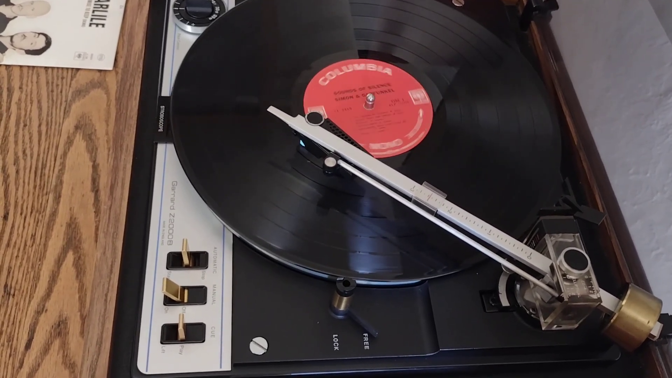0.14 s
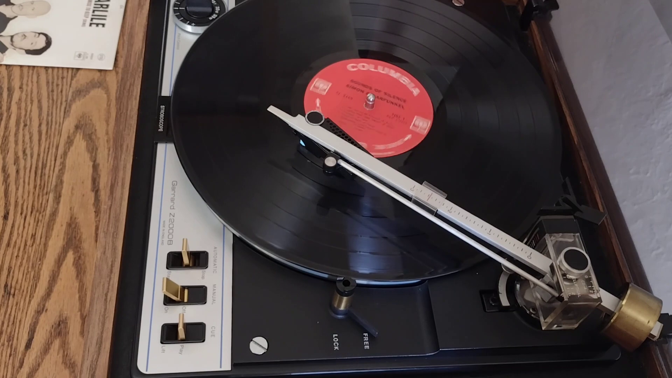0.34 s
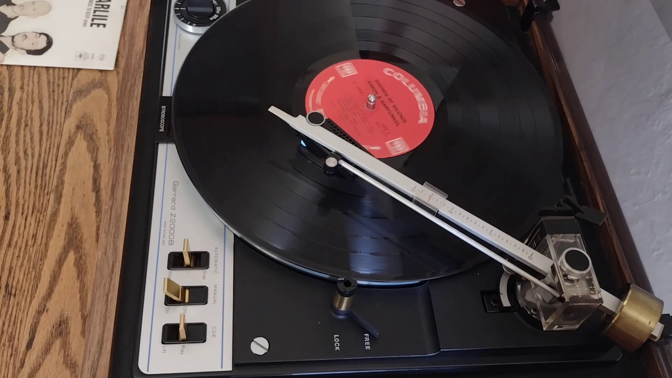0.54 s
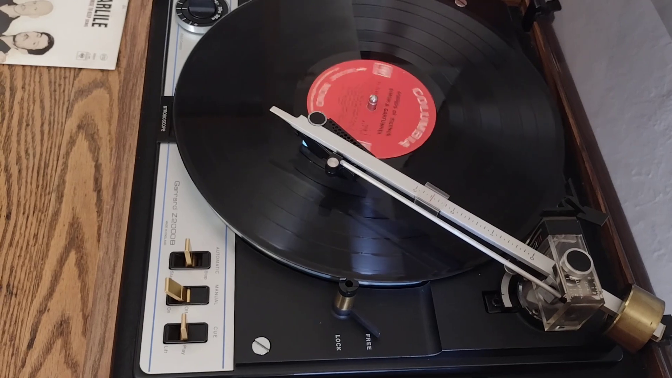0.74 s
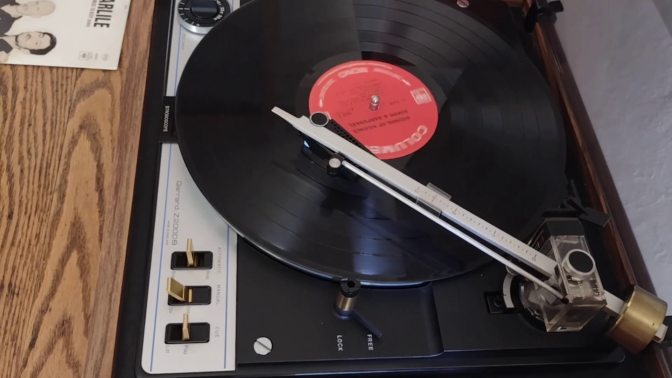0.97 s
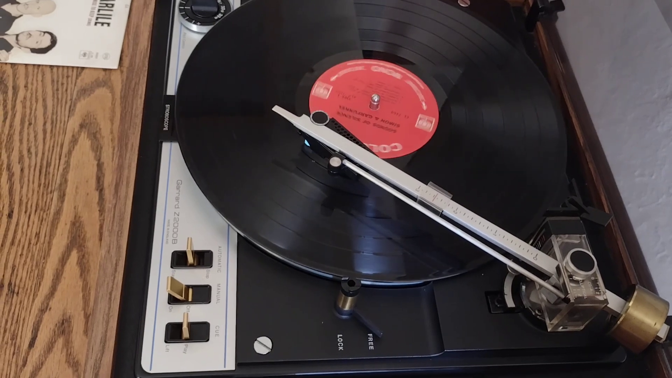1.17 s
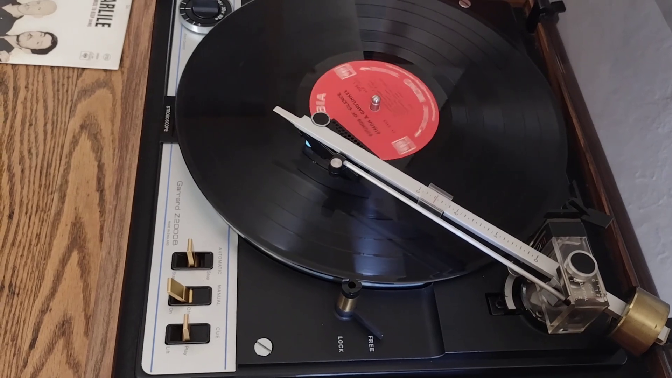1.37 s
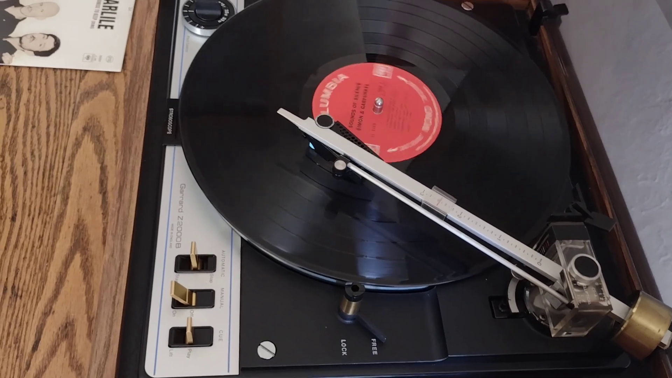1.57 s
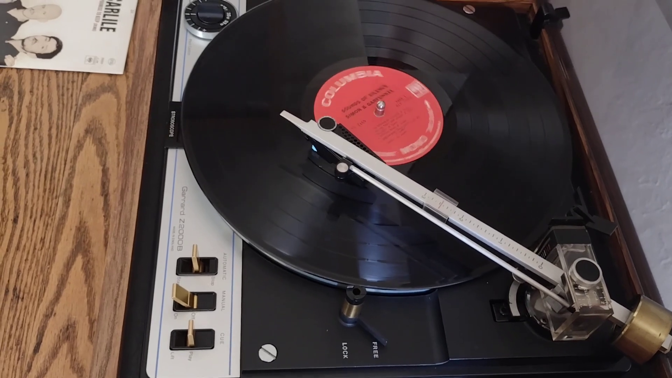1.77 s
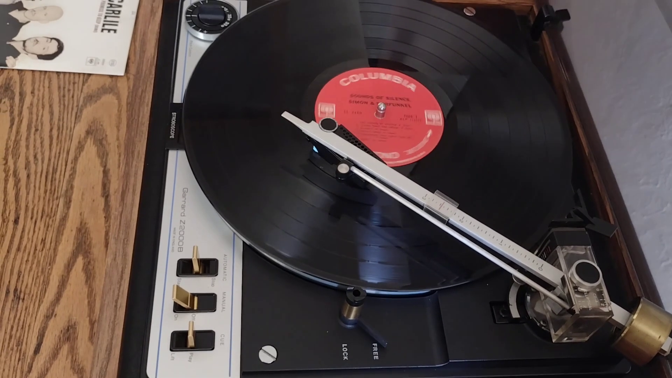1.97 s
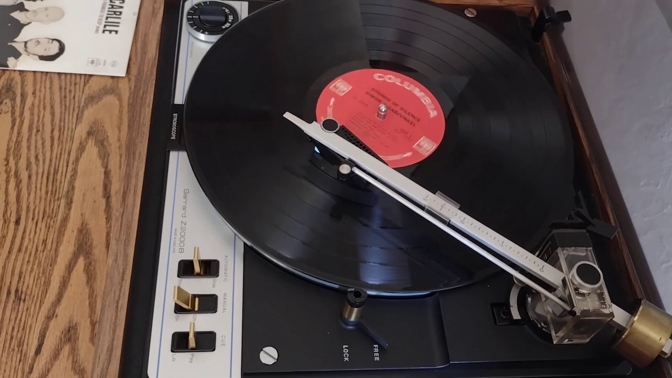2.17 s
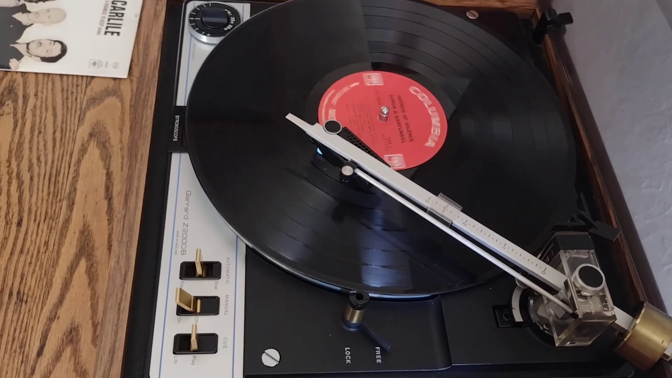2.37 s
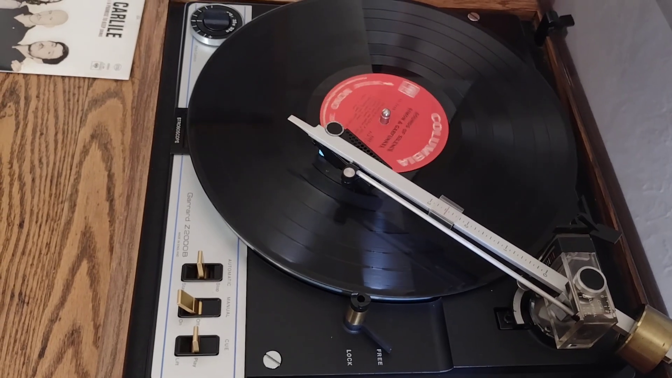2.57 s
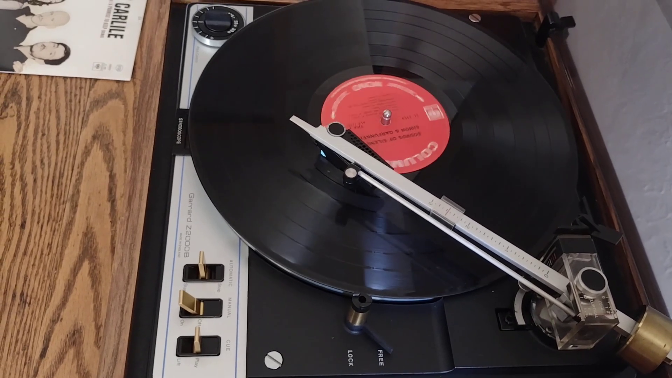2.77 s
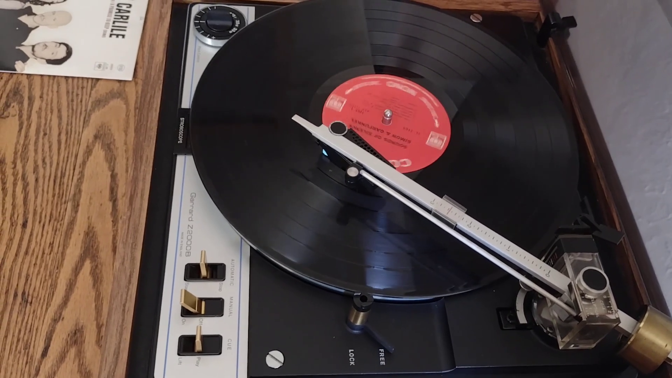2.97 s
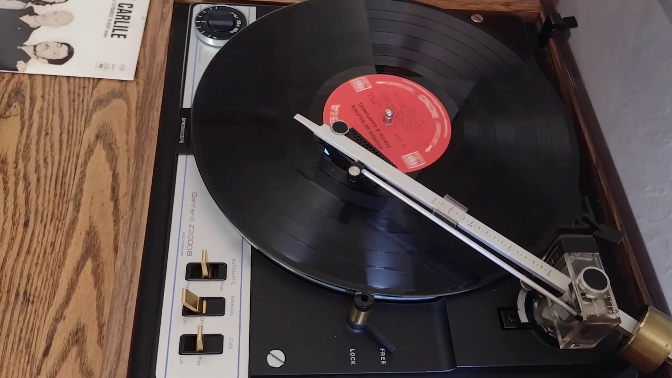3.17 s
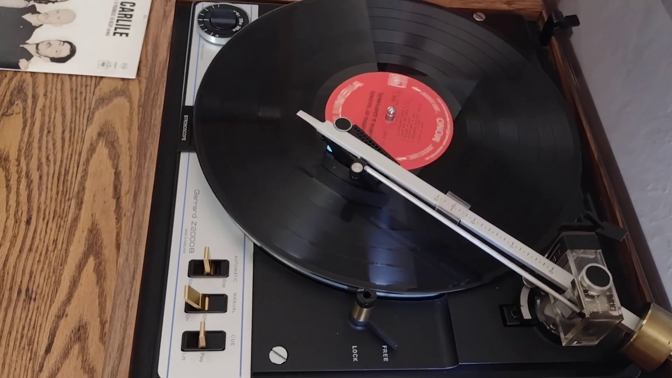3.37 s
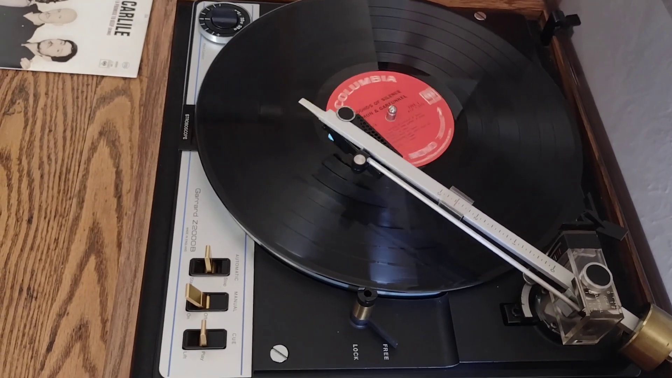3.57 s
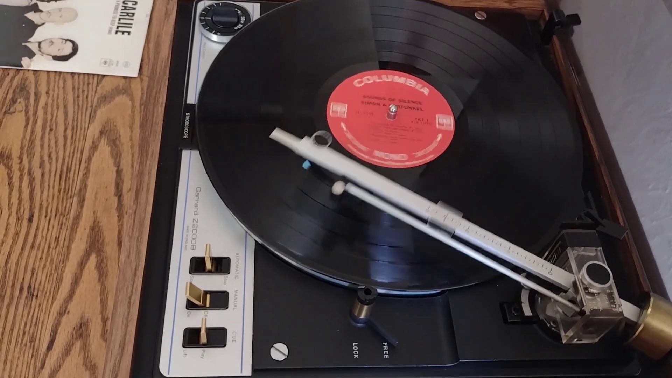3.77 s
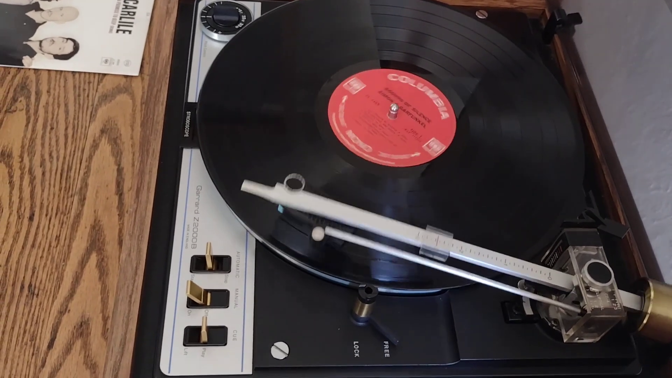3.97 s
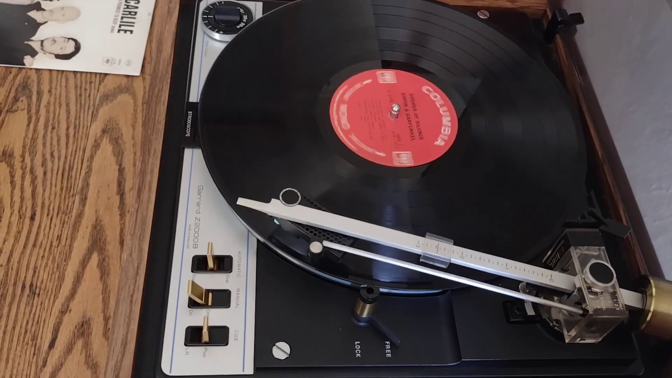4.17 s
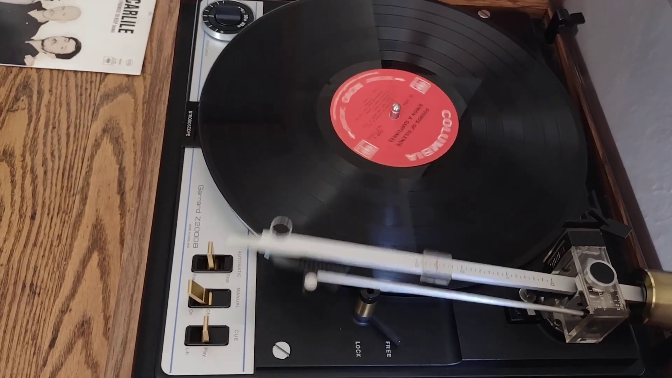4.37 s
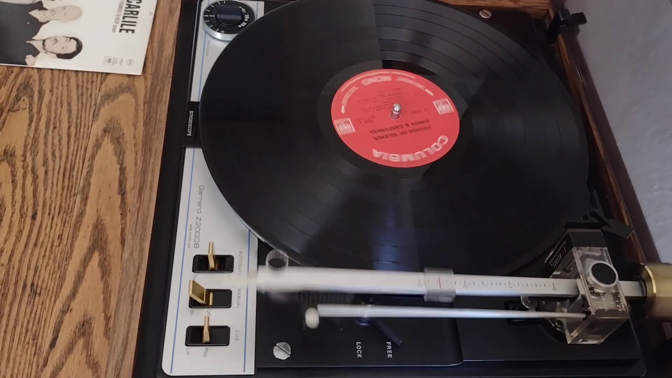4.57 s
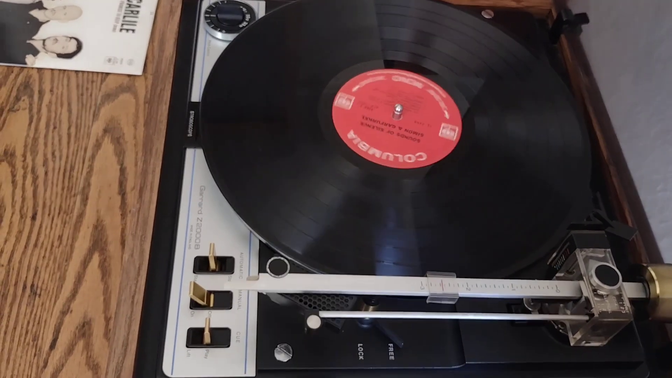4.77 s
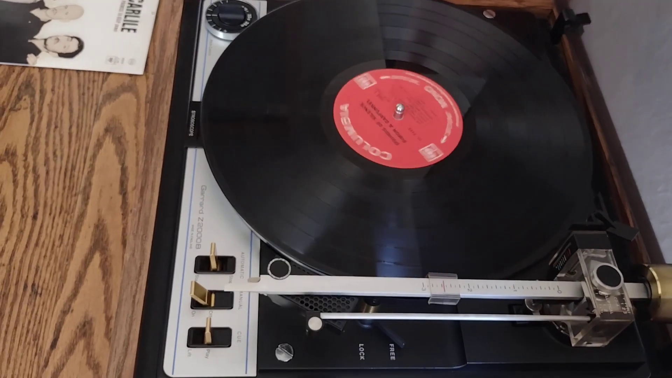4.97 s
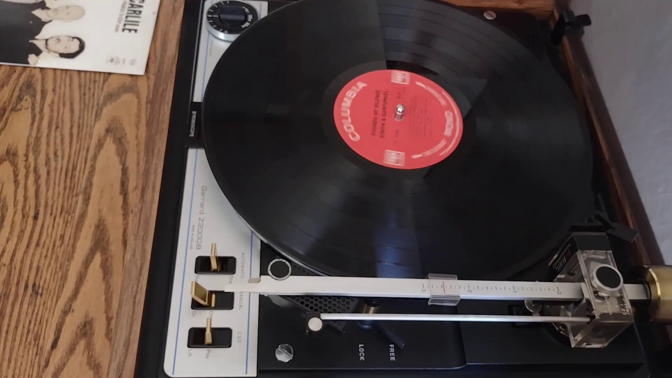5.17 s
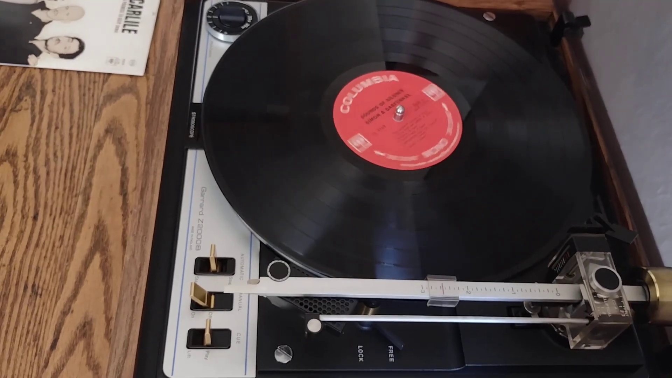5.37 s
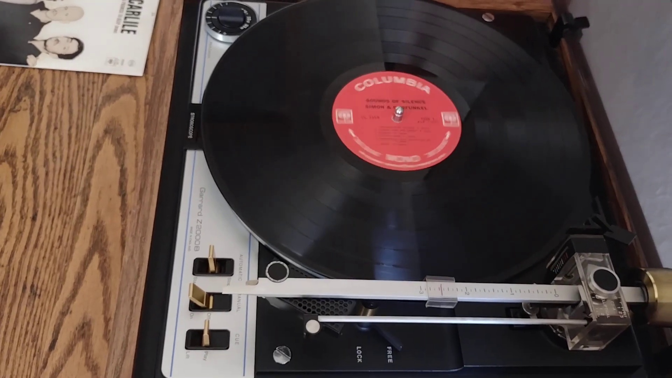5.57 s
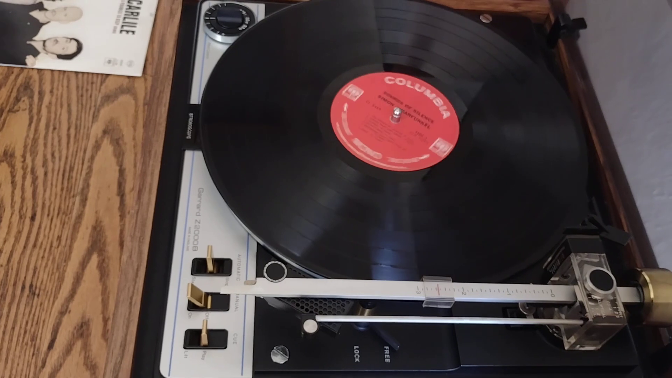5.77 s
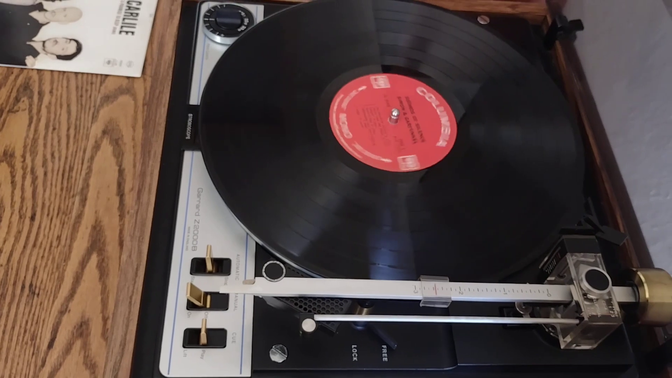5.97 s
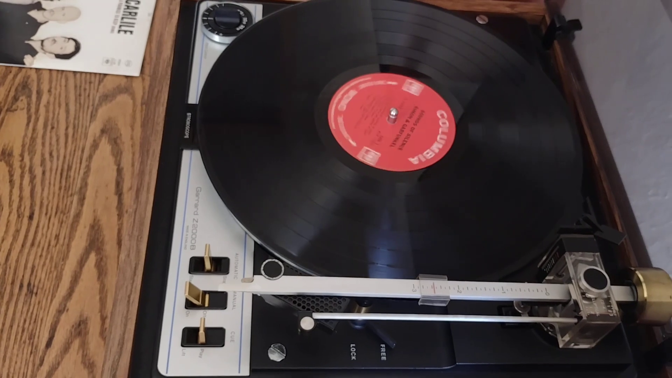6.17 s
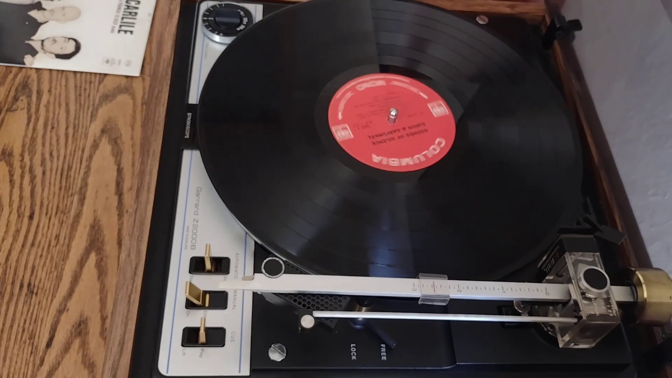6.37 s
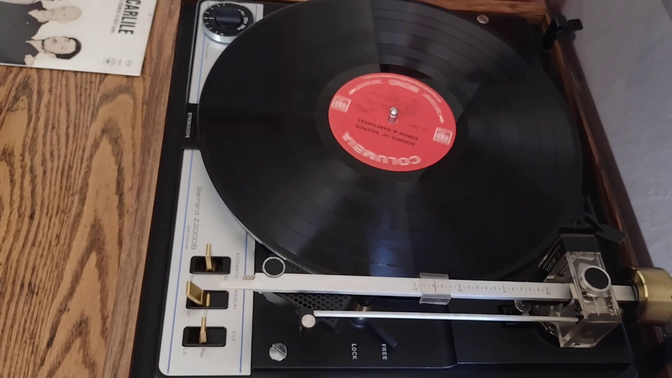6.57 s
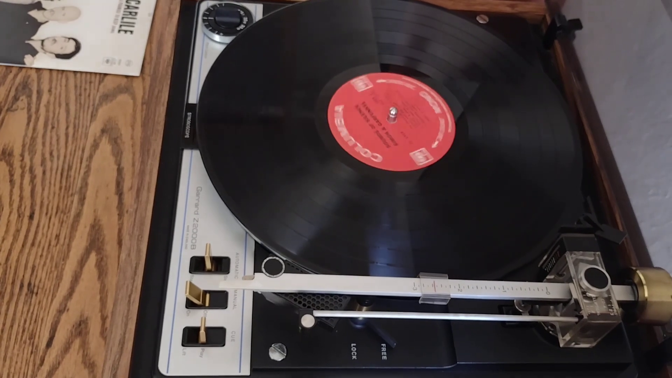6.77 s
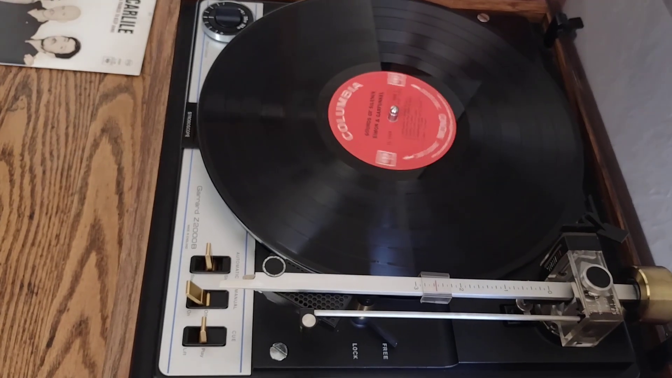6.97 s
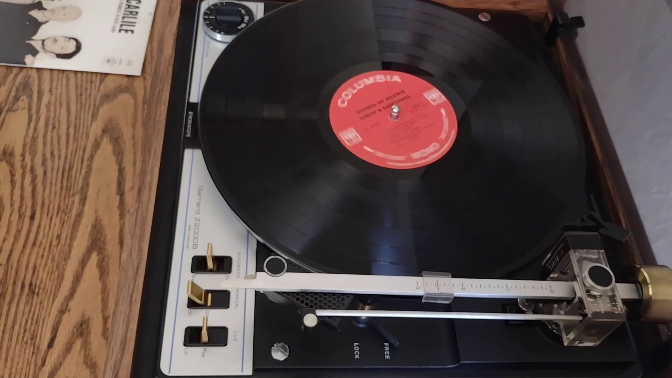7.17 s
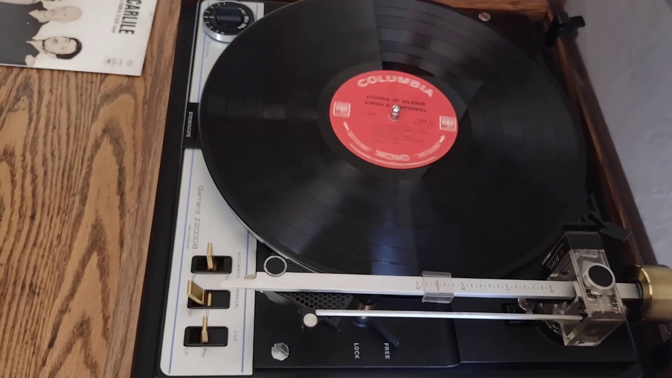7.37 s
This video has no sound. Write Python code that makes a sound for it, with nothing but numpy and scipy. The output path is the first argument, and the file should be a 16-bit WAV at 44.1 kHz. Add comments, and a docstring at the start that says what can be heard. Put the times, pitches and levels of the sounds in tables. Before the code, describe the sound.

An automatic turntable is heard from nearby, indoors, with short soft room echo. Faint loudspeaker rumble and groove crackle come first, with a muffled low thump near the start. After a calm stretch, levers snap in a quick irregular run, dry and steely, over a heavy bass thud. The arm swings home to separate clacks, light scraping and short bright hisses, fading into small ticks and gentle background hiss.

```python
"""A quiet room with an automatic record player: the stylus runs in the lead-out groove, and its rumble
comes through the loudspeakers as noise exciting damped cabinet modes; low soft thumps push and ring. The cam
lifts the arm and swings it home: levers clack as noisy cracks and ringing modes of the steel chassis, and the
cam slides on with a soft hiss of shaped noise and comes to rest. A diffuse echo and room tone surround them."""
import sys
import numpy as np
from scipy import signal
from scipy.fft import rfft, irfft, next_fast_len
from scipy.io import wavfile

SR = 44100
rng = np.random.default_rng(int(sys.argv[2]) if len(sys.argv) > 2 else 0)


def int16_out(signal):
    """Quantize to a 16-bit WAV file."""
    q = np.round(np.clip(np.atleast_2d(signal).T, -1, 1) * 32767)
    wavfile.write(sys.argv[1], SR, q.astype(np.int16))


N = 327663

# modes of loudspeaker cabinets and room: f/Hz, relative level/dB, t60/s
CABINET_MODES = [(68.46, -30, 0.27), (92.66, 6, 0.31), (107.8, -12, 1), (135.9, 1, 0.431), (167.6, 1, 0.28),
                 (190.5, -6, 0.39), (223, -4.5, 0.094), (251, -8, 0.1), (295.7, -1.5, 0.088),
                 (372, -0.5, 0.052), (408.6, -7, .25), (505, -6, 0.31), (658.3, -8, 0.13),
                 (733, -1.5, 0.09), (853, -10, 0.068)]
CUTOFF_HZ, BASS_CUT_HZ = 8376, 68


def clacks():
    """Impact excitation: each lever gives a short noisy crack and leaves the damped chassis modes ringing."""
    # lever blows: t/s, peak level/dB, colour near 500 Hz/dB, near 3.2 kHz/dB, near 6.5 kHz/dB, pin level/dB,
    # damping by the lever that stays pressed on/(dB per 10 ms), where negative values mean none
    blows = [(2.65, -53, 1.5, -15, -1, -30, -10), (2.662, -39, 2, -0.5, 6, -31, -1.5),
             (2.762, -29, -24, -7.5, -28, -35, 3), (2.787, -20, -24.5, -7.5, -26.5, -15.5, 0.2),
             (2.827, -46, -15, -17, -11, -45, -2), (3.046, -52.5, 1.5, -1, -1, -27, -2),
             (3.2346, -42, -12, 2, 13, -35, 2.5), (3.258, -28, -21, -8, -20.5, -11.5, 0.4),
             (3.381, -39, -32, -1.5, -4, -25.5, -4), (3.392, -22, -22, -13, -25.5, -17.5, .5),
             (3.4125, -24, -27, -5, -19.5, -11, -0.6), (3.607, -49, -12, -6, -5, -31, -4),
             (3.617, -38, -9.5, -5, 3, -27, .8), (3.625, -14.5, -28, -1, -17.5, -20, .3),
             (3.721, -22.5, -23.5, -6.5, -27.5, -13.5, 2.3), (3.881, -55.5, -8.5, -11, -18, -38, 0.5),
             (3.967, -51.5, -16.5, -5.5, -13, -30, 1.5), (3.987, -27.5, -27, -9, -35.5, -19.5, 1.3),
             (4.337, -52, -14, -9.5, -3.5, -23.5, 1), (4.479, -56, -18.5, -24, -33, -41.5, 1),
             (4.6446, -28, -17.5, -13.5, -4.5, -19, 3), (4.6936, -28, -8, -7.5, -4, -31, 4),
             (4.779, -53, -13.5, -9, -12.5, -36, -0.5), (5.012, -23.5, -30, -6, -25.5, -42.5, 5),
             (5.021, -30.5, -22.5, -8.5, -32, -44, 1.5), (5.761, -48, -14, -20, -31, -41, -2),
             (5.845, -51, -10, 8, 13, -30, 2.5), (5.994, -45, -4.5, 0, 4.5, -22, 0),
             (6.244, -58, -13, -20, -25, -25, 2.5), (6.415, -55.5, -20.5, 11.5, 3, -32.5, 4),
             (6.952, -53, -19, -15, -23.5, -29, 4), (7.001, -53.5, -21, 7, 5.5, -25.5, 3.5)]
    # strongest chassis modes: f/Hz, relative level/dB, t60/s
    chassis_modes = [(378.3, 9.5, 0.069), (621.3, 4.5, 0.088), (1097, -29.5, 0.074), (1300, -19.5, 0.15),
                     (1230, -7, 0.042), (1346, -13, 0.075), (1464.4, 2, 0.16), (1536.4, 2, 0.083),
                     (1575, -10.5, 0.1), (1879, -4, 0.09), (2014, -13.5, 0.044), (2561, -2, 0.016),
                     (3260, -9.5, 0.0676), (4030, -9, 0.035), (5990, -9, 0.0056)]
    # a small steel pin, rung at each blow's own level: f/Hz, relative level/dB, t60/s
    pin_modes = [(5570, 8, .032), (7750, 1, .022)]
    # a stronger blow cracks longer and rings more; a brighter one is a glancing tick that rings less
    full_scale_crack_ms, crack_ms_per_db = 13.5, 0.47   # decay time constant; shorter for each dB below
    ring_per_db, ring_per_treble_db = 0.37, -0.19
    crack_db, attack_ms = 10, 2.2
    shoulder_db = -5   # added at 1 kHz to half the colour near 500 Hz
    damping_hz = 1500   # strong modes lose level in step with their pitch; the damping column holds here
    out = np.zeros(N)
    hz = np.array(chassis_modes)[:, 0]
    signs = (-1.) ** np.arange(len(hz))   # neighbouring modes swing in opposite senses
    strong = damped(chassis_modes)
    small_hz, small = crowd(count=500)
    t = np.arange(small.shape[1]) / SR
    for s, peak_db, low_db, mid_db, high_db, pin_db, damping_db in blows:
        tint = [(500, low_db), (1000, low_db / 2 + shoulder_db), (1400, 0), (1950, 0),
                (2600, mid_db), (4200, mid_db), (6500, high_db)]
        loss_db = max(damping_db, 0) * t / .01

        gains_db = at_hz(tint, hz) + rng.normal(0, 2.0, len(hz))
        strong_gains = from_db(gains_db[:, None] - np.outer(hz / damping_hz, loss_db))
        ring = signs @ (strong * strong_gains)
        small_gains = from_db(at_hz(tint, small_hz)) * rng.standard_normal(len(small_hz))
        ring += from_db(-loss_db) * (small_gains @ small)

        crack_ms = max(full_scale_crack_ms + crack_ms_per_db * peak_db, 1)
        crack = colour(rng.standard_normal(len(t)), [(250, low_db - 16)] + tint)
        crack *= np.exp(-1e3 * t / crack_ms)

        ring_db = ring_per_db * peak_db + ring_per_treble_db * high_db
        sound = from_db(ring_db) * ring + ringing(pin_modes, pin_db) + from_db(crack_db) * crack
        contact = np.minimum(1e3 * t / attack_ms, 1)   # the contact force builds up
        add(out, s, sound * contact, peak_db)
    return out


def crowd(count):
    """Modal density: evenly scattered small modes of plates and levers; gives their f/Hz and signals."""
    # outline of the small modes: f/Hz, relative level/dB, t60/s
    outline = [(453, -17, 0.34), (1100, -10, 0.29), (1447, -10, 0.079), (2014, -13, 0.091),
               (2140, -26, 0.17), (2810, -8.5, 0.097), (3890, -11.5, 0.048), (4760, -20, 0.098),
               (6800, -6.5, 0.04), (8460, -29.5, 0.018)]
    hz = np.linspace(450, 8400, count) + rng.uniform(-8, 8, count)
    mode_db = at_hz(outline, hz)
    t60 = at_hz(np.array(outline)[:, ::2], hz)
    return hz, damped(np.transpose([hz, mode_db, t60]))


def sliding():
    """Sliding friction: the cam's strokes shape a bright hiss and a chassis rub from dense noise."""
    # hiss: f/Hz, relative spectral density level/dB
    slide_colour = [(1530, -40), (2600, -18.5), (3520, -3.5), (3840, -4.5), (4170, -8), (4840, -9.5),
                    (6880, -3), (7870, -11.5), (8220, -28), (10700, -60.5), (18100, -120)]
    # chassis rub: f/Hz, relative spectral density level/dB
    rub_colour = [(240, -45), (400, -9.5), (560, 3), (601, -1.5), (875, -4), (1170, 6), (1270, -2.5),
                  (1650, 5), (1980, -7.5), (2600, -6), (3380, -48), (5720, -120)]
    hiss = strokes(column=2) * rms_one(colour(grains(), slide_colour))
    rub = strokes(column=3) * rms_one(colour(grains(), rub_colour))
    return hiss + rub


def strokes(column):
    """Envelope: each stroke rises, sags slowly while it lasts and falls; the loudest sets the gain."""
    # strokes of the cam under the chassis: start t/s, length/s, bright hiss level/dB, chassis rub level/dB
    cam_strokes = [(4.285, 0.1, -80, -75), (4.483, 0.28, -94.5, -79.5), (4.734, 0.081, -78.5, -80.5),
                   (4.94, 0.29, -74.5, -73.5), (5.368, .06, -80, -77.5), (5.522, .11, -76, -75),
                   (5.849, 0.28, -67, -67.5), (6.42, 0.042, -78.5, -79), (7.013, 0.024, -87, -82.5),
                   (7.184, 0.027, -86.5, -87.5)]
    rise, fall, sag = 117, 174, 1   # dB per s
    t = np.arange(N) / SR
    levels_db = []
    for row in cam_strokes:
        start, length = row[:2]
        before = np.maximum(start - t, 0)
        during = np.clip(t - start, 0, length)
        after = np.maximum(t - start - length, 0)
        levels_db.append(row[column] - rise * before - sag * during - fall * after)
    return from_db(np.max(levels_db, axis=0))


def scrapes():
    """Band-limited friction: short low scrapes of the linkage are narrow bands of noise in bell envelopes."""
    # scrapes: centre t/s, f/Hz, bandwidth/Hz, rms level at the centre/dB, length/ms
    linkage = [(4.5, 658, 78.2, -70, 38), (4.97, 660, 151, -67.5, 83), (5.2, 590, 201, -71.5, 72),
               (5.53, 396, 50, -66, 110)]
    rubbing, out = grains(), np.zeros(N)
    for s, hz, width, db, ms in linkage:
        band = rms_one(pass_band(rubbing, hz - width / 2, hz + width / 2))
        out += from_db(db) * swell(s, ms) * band
    return out


def rustles():
    """Broadband friction: faint rustles of dust in the groove are wide-band noise in bell envelopes."""
    # rustles: centre t/s, rms level at the centre/dB, length/ms
    dust = [(.32, -76, 45), (0.375, -65.5, 5.4), (1.161, -71.5, 34), (1.187, -71, 12), (1.96, -76.5, 51),
            (2.152, -65, 4.4)]
    puffs = sum(from_db(db) * swell(s, ms) for s, db, ms in dust)
    return puffs * rms_one(pass_band(grains(), 310, 6800))


def grains():
    """Intermittent contact: white noise with random, exponentially distributed boosts in dB, capped."""
    boost_db = 3.7 * np.minimum(rng.exponential(1, N), 4)
    return rng.standard_normal(N) * from_db(boost_db)


def thumps():
    """Impulse response: a low soft thump is one delayed push over damped ringing modes, with a noisy edge."""
    # low soft thumps, the last as the mechanism comes to rest: t/s, peak level before the bass cut/dB,
    # band lower f/Hz, upper f/Hz (raised to 1.2 times the lower if below it), push level/dB
    thump_rows = [(.8505, -22.5, 114, 840, 10.5), (2.65, -39.5, 146, 215, 1.5), (2.79, -39, 70.5, 200, 8.5),
                  (2.849, -37, 57, 200, 11.5), (2.949, -39.5, 80, 203, 2.5), (3.064, -43.5, 156, 193, 2.5),
                  (3.24, -43.5, 137, 295, 3), (3.385, -19, 62.2, 188, 2), (6.235, -53, 80.3, 248, 5)]
    # short swing of the push: f/Hz, relative level/dB, t60/s
    push_modes = [(157.5, 0.5, 0.035), (292.9, -4, 0.085)]
    push_lag_ms = 3.885
    edge_db, edge_hz, edge_ms = -14, 1500, 8.6   # level for a 300 Hz upper band edge, low-pass, decay
    out, body = np.zeros(N), ringing(CABINET_MODES)
    t = np.arange(len(body)) / SR
    for s, peak_db, low_hz, high_hz, push_db in thump_rows:
        high_hz = max(high_hz, 1.2 * low_hz)
        swing = pass_band(ringing(push_modes), low_hz, high_hz, order=1)
        push = np.interp(t - push_lag_ms / 1e3, t, swing, left=0)
        thump = pass_band(body, low_hz, high_hz) + from_db(push_db) * push / push.max()
        edge = low_pass(rng.standard_normal(len(t)), edge_hz) * np.exp(-1e3 * t / edge_ms)
        edge *= from_db(edge_db) * (high_hz / 300) ** 2   # a brighter thump has a stronger edge
        add(out, s, thump + edge, peak_db)
    return signal.sosfilt(signal.butter(4, BASS_CUT_HZ, "high", fs=SR, output="sos"), out)


def rumble():
    """Random excitation of resonators: groove roughness keeps the cabinet modes stirring."""
    # deep rumble, stronger while the cam shakes the platter, muted once the arm lifts: t/s, rms level/dB
    deep = [(0.0, -66), (0.33, -61.5), (1.5, -59), (2.62, -63.5), (2.81, -43), (2.95, -53), (3.2, -61.5),
            (3.45, -50.5), (3.7, -60.5)]
    roughness_cut_hz = 180
    mean_db, upper_db, upper_swing = -58.5, -62, 1.2   # the part above 140 Hz swings more widely
    rough = low_pass(rng.standard_normal(N), roughness_cut_hz)
    stir = signal.fftconvolve(rough, ringing(CABINET_MODES))[:N]
    upper = [(s, upper_db + upper_swing * (db - mean_db)) for s, db in deep]
    deep_part = level(deep) * rms_one(pass_band(stir, BASS_CUT_HZ, 120))
    upper_part = level(upper) * rms_one(pass_band(stir, 140, 1400))
    return deep_part + upper_part


def room(x):
    """Diffuse reverberation: octave bands of noise, each dying at its own rate, convolved with the sound."""
    # reverberation time: f/Hz, t60/s
    decay_times = [(100, 0.35), (700, 0.37), (1500, 0.35), (3000, 0.3), (7000, 0.23)]
    t, tail = np.arange(SR // 2) / SR, 0
    for low in 60 * 2. ** np.arange(8):
        band = pass_band(rng.standard_normal(len(t)), low, 2 * low)
        tail = tail + band * from_db(-60 * t / at_hz(decay_times, 1.4 * low))
    tail *= np.minimum(t / 0.016, 1)   # reflections build up
    return signal.fftconvolve(x, tail / np.sqrt(np.sum(tail ** 2)))[:N]


def air():
    """Stationary noise: room tone and microphone hiss are white noise shaped in frequency."""
    # room tone and microphone hiss: f/Hz, relative spectral density level/dB
    air_colour = [(15, -71), (25, -25), (64, -9.5), (102, -4.5), (162, -5.5), (216, -15), (319, -16.5),
                  (369, -22), (416, -19), (482, -22), (644, -21.5), (1050, -25.5), (1130, -27),
                  (6450, -33.5), (8220, -36), (10700, -91), (18100, -120)]
    return from_db(-69) * rms_one(colour(rng.standard_normal(N), air_colour))


def damped(modes):
    """Free vibration: rows of decaying sines, one for each (f/Hz, level/dB, t60/s) mode, 0.4 s long."""
    t = np.arange(round(.4 * SR)) / SR
    hz, db, t60 = np.transpose(modes)[:, :, None]
    return from_db(db - 60 * t / t60) * np.sin(2 * np.pi * hz * t)


def ringing(modes, gains_db=0):
    """Modal superposition: a body's response to one click; neighbouring modes swing in opposite senses."""
    return ((-1.) ** np.arange(len(modes)) * from_db(gains_db)) @ damped(modes)


def from_db(db):
    """Level to amplitude ratio: 20 dB is a factor of ten."""
    return 10 ** (np.asarray(db) / 20)


def rms_one(x):
    """Normalization to unit root mean square."""
    return x / np.sqrt(np.mean(x ** 2) + 1e-20)


def level(rows):
    """Envelope interpolated in dB from (t/s, level/dB) rows; practically silent outside them."""
    s, db = np.transpose(rows)
    return from_db(np.interp(np.arange(N) / SR, s, db, left=-200, right=-200))


def swell(s, ms):
    """Gaussian envelope centred on s, falling to 1/e at half of ms on either side."""
    return np.exp(-(2e3 * (np.arange(N) / SR - s) / ms) ** 2)


def at_hz(points, hz):
    """Interpolation of the second column on a logarithmic frequency axis, constant beyond the ends."""
    points = np.array(points)
    return np.interp(np.log(hz), np.log(points[:, 0]), points[:, 1])


def colour(x, spectrum):
    """Spectral shaping: Fourier components are weighted by (f/Hz, level/dB) points."""
    size = next_fast_len(len(x))
    hz = np.maximum(np.arange(size // 2 + 1) * SR / size, 1)
    return irfft(rfft(x, size) * from_db(at_hz(spectrum, hz)), size)[:len(x)]


def low_pass(x, hz):
    """Second-order Butterworth filter that attenuates above hz."""
    return signal.sosfilt(signal.butter(2, hz, fs=SR, output="sos"), x)


def pass_band(x, low_hz, high_hz, order=2):
    """Butterworth filter that attenuates outside the band."""
    return signal.sosfilt(signal.butter(order, [low_hz, high_hz], "band", fs=SR, output="sos"), x)


def add(out, s, sound, peak_db):
    """Superposition: mix a sound in at time s with the given peak level."""
    at = round(s * SR)
    out[at:at + len(sound)] += (from_db(peak_db) / np.abs(sound).max() * sound)[:N - at]


def scene():
    """Superposition of the player, the thumps, their echo, the rumble and the room tone."""
    player = clacks() + sliding() + scrapes() + rustles()
    low_thumps = thumps()
    thump_send = from_db(-5.5) * pass_band(low_thumps, 187, CUTOFF_HZ)   # less of their bass echoes
    echo = room(from_db(-13) * player + thump_send)
    return (player + low_thumps + echo + rumble() + air())[None]


def record(dry):
    """Band limitation: the microphone fades above its top resonance, then a steep filter cuts the top."""
    fading = colour(dry[0], [(7500, -0.5), (8300, -17)])[None]
    return signal.sosfilt(signal.ellip(10, .5, 70, CUTOFF_HZ, fs=SR, output="sos"), fading)


dry = scene()
out = record(dry)
int16_out(out)
```